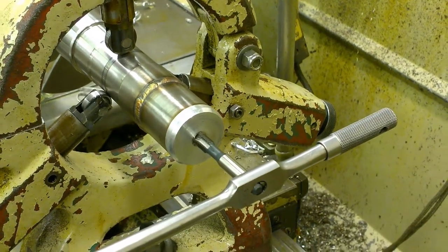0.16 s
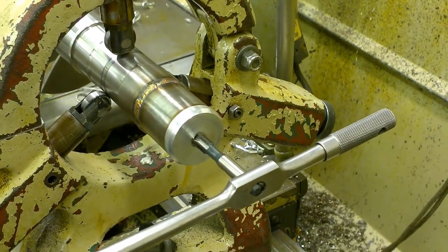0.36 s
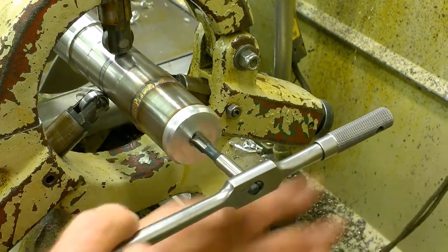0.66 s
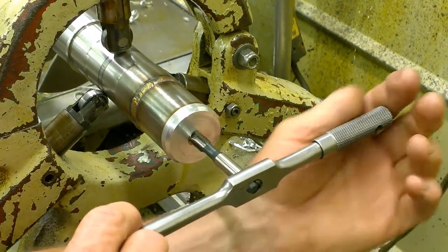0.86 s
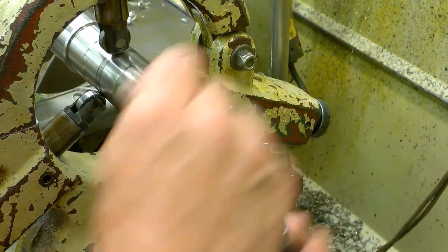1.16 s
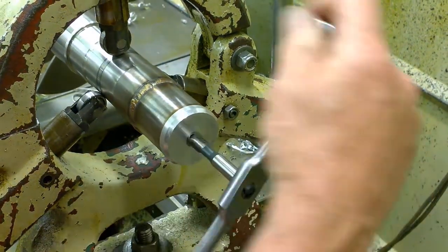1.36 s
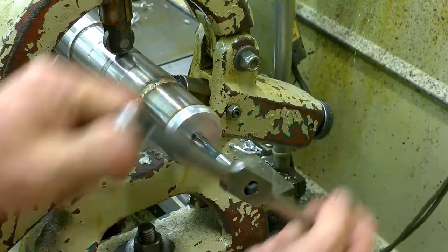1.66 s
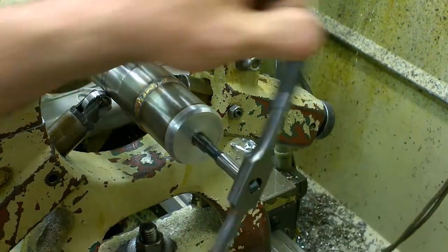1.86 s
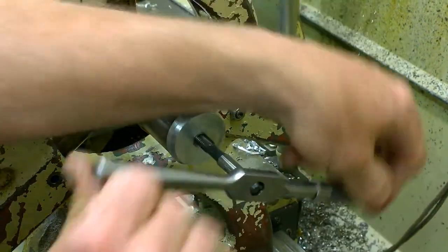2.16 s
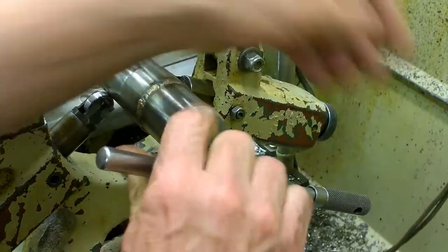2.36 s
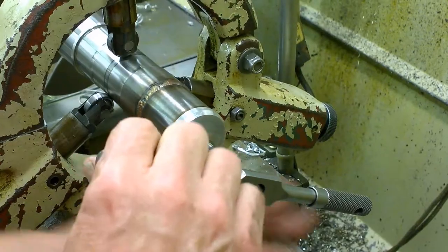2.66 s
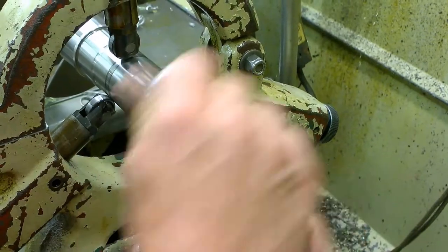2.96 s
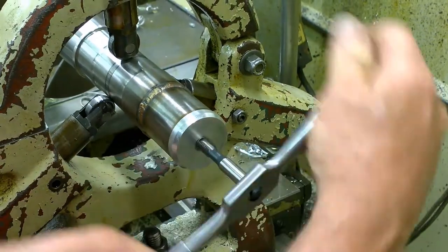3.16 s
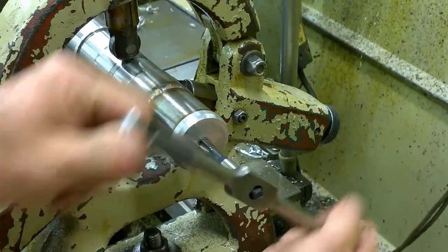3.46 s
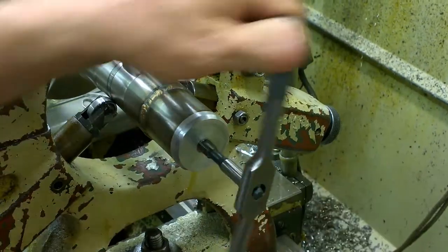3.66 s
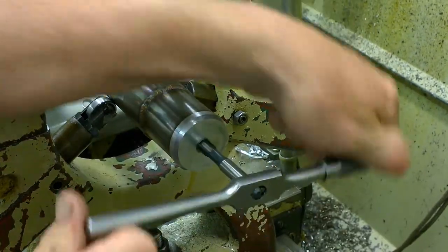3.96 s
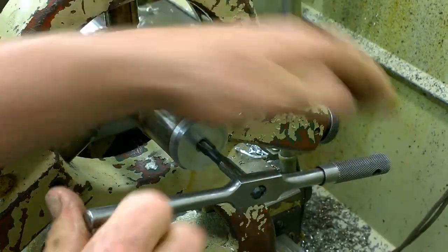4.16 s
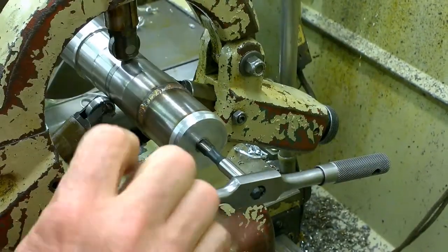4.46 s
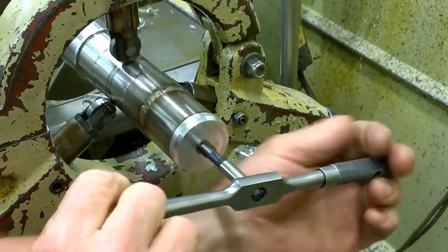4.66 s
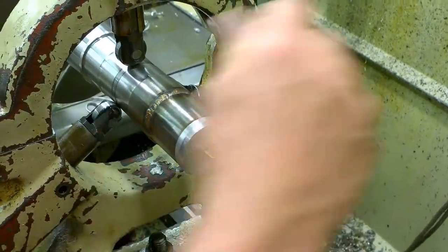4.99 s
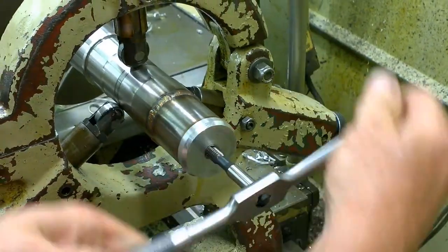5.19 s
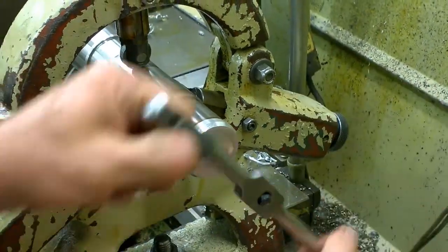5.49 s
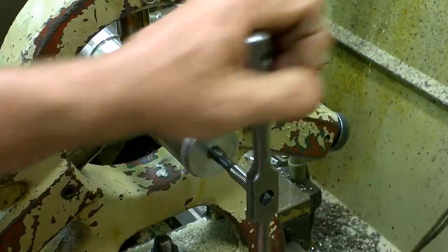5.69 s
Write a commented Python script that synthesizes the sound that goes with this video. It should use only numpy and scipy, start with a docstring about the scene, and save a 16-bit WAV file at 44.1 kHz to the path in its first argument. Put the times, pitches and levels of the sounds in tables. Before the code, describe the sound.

A hand-turned tap squeals twice as it cuts into metal, high and wavering, over the steady machine hum of a workshop.

```python
"""A large machine workshop. From the start, motors hum, a drive whines, and fans and distant machines
fill the room. At 0.3 s a cutting tool bites and chatters: it sticks and slips in a high squeal that hops
between close pitches, throbs with the cutter teeth and hisses as metal peels off. The tool lifts at 1.6 s;
while the squeal rings out in the hall, there is a far tap on metal and one more soft swell of hiss.
A second cut squeals from 2.5 s to 3.9 s and rings out too, leaving the machines running."""
import sys
import numpy as np
from scipy import signal
from scipy.fft import rfft, irfft
from scipy.io import wavfile
from scipy.ndimage import uniform_filter1d

SR = 44100
rng = np.random.default_rng(int(sys.argv[2]) if len(sys.argv) > 2 else 0)


def waveform_to_disk(signal):
    """Save audio, clipped to [-1, 1], as 16-bit WAV at the path in sys.argv[1]."""
    frames = np.transpose(np.atleast_2d(signal))
    scaled = np.clip(frames, -1, 1) * 32767
    samples = np.round(scaled).astype(np.int16)
    wavfile.write(sys.argv[1], SR, samples)


N = 257103

# The noise of the hall. Each row: frequency in Hz, relative level in dB.
HALL_SPECTRUM = [(15, -40), (30, -8), (50, -7), (152, 0), (349, -8.5), (551, -9.5), (850, -11), (1200, -17),
                 (1530, -22.5), (2500, -24.5), (3430, -23.5), (4400, -30), (6370, -27.5), (8110, -34.5),
                 (11000, -36.5), (15500, -45)]
# How wide it sounds. Each row: frequency in Hz, level of the side noise over the middle noise in dB.
HALL_WIDTH = [(60, -20), (200, -18.5), (380, -9.5), (700, -7.5), (1290, 1.5), (2400, 0.5)]
# Which way it leans. Each row: frequency in Hz, left minus right in dB.
HALL_BALANCE = [(60, -4), (110, -2), (200, -1.0), (380, 0), (700, -3), (1290, -0.5), (2380, -3.5),
                (4400, -2.5), (8120, -2), (15000, 5.5)]
# Two fans run a little apart in speed, so they beat. Each entry: one fan's blade tone in Hz.
FAN_BLADE_HZ = (384.5, 386.17)
# Each entry, one per harmonic: a time in seconds when the two fans are in step.
FAN_IN_STEP_TIMES = (.47, .22, 0)
# Each row, one per harmonic: level of the first fan in dB, level of the second in dB.
FAN_LEVELS = [(-50.5, -52.5), (-49, -52.5), (-59, -75.5)]
# The motor's hum. Each row: multiple of the motor's rate, level in dB.
MOTOR_HARMONICS = [(1, -53), (12, -56), (24, -70), (40, -69), (42, -75), (48, -77), (54, -74), (60, -76),
                   (96, -72), (120, -76)]
# Steady mains and gear tones. Each row: pitch in Hz, level in dB.
GEAR_TONES = [(120, -51), (286.6, -57), (360, -62), (573.2, -57), (858, -62), (974.5, -62), (1176.6, -62)]
# Low room resonances and narrow ringing bands in the workshop's rumble.
# Each row: pitch in Hz, width in Hz, level in dB.
RESONANCES = [(61.8, 7.21, -51), (92.814, 10.11, -52), (124.86, 11.9, -51.5), (149.6, 5.877, -50),
              (202.89, 11.013, -49), (247.69, 11.645, -52), (711.22, 16.63, -50), (1965.3, 38.14, -58),
              (4331, 6.14, -78.5), (6386.4, 9.4, -69.5), (6460.6, 7.53, -68)]
# A deep throb that comes and goes. Each row: time in seconds, level in dB.
DEEP_THROB_LEVELS = [(0, -37), (.06, -33.5), (.23, -36.5), (.34, -50.5), (.45, -35), (.73, -51.5),
                     (1.36, -40), (1.54, -44), (1.75, -35), (2.13, -41.5), (2.26, -35), (2.58, -41.5),
                     (2.69, -55.5), (3.9, -48), (4.12, -39.5), (4.22, -53), (5.1, -48.5), (5.83, -48.5)]
# The drive's whine. Each row: time in seconds, level in dB.
WHINE_LEVELS = [(0, -65), (1.25, -62), (1.75, -65), (3.25, -61), (4.25, -64), (5.2, -63), (5.5, -59),
                (5.83, -58)]
# Tones beside the whine. Each row: distance in multiples of the beat rate, relative level in dB.
WHINE_SIDE_TONES = [(-3, -8.5), (-2, -9.5), (-1, -18.5), (1, -22.5), (2, -26.5), (3, -22.5)]
# A far tap on metal. Each row: start in seconds, pitch in Hz, level in dB, seconds to fade by 60 dB.
FAR_TAPS = [(1.644, 944.3, -33, 0.17)]
# The cutting hiss. Each row: frequency in Hz, relative level in dB.
HISS_SPECTRUM = [(3800, -22.5), (4400, -26.5), (5300, 5.5), (6800, -1), (7600, -8), (9500, -12),
                 (12000, -15.5), (14500, -26.5), (15500, -33.5)]
# Its swell after the first cut. Each row: peak time in seconds, half length in seconds, level in dB.
HISS_SWELLS = [(1.853, 0.11975, -48)]
# Brief tones as the tool bites. Each row: start in seconds, pitch in Hz, left and right levels in dB,
# seconds to fade by 60 dB.
BITE_TONES = [(.33, 4956, -38, -29.5, 1.0), (.4, 5030, -41, -40.5, 0.662), (2.52, 5147, -39, -42, 0.703)]
# The two cuts. Each row: bite and lift times in seconds, spindle rate in Hz, tooth rate in Hz.
CUT_PASSES = [(.322, 1.57, 40, 233.3), (2.462, 3.86, 29, 215.6)]
# Pitches the chatter locks on to. Each row: start in seconds, pitch in Hz.
CHATTER_PITCHES = [(0, 5001), (.4, 4890), (.54, 4864), (1.03, 4867), (2.3, 5036), (2.68, 5025),
                   (3.07, 4993), (3.23, 5028), (3.39, 4997), (3.78, 4992)]
# Throbbing tones beside the squeal. Each row: distance in multiples of the tooth rate,
# relative level in dB in the first cut, the same in the second.
TOOTH_TONES = [(-2, -7.5, -6), (-1, 3.5, 2.5), (1, 5, 0.5), (2, -16.5, -9.5), (3, -22, -23)]
# Layers that sound with the squeal. Each named row: level in dB in the first cut and in the second,
# how many dB lower it starts, build-up in seconds, slope in dB per second, seconds to fade by 60 dB.
CUT_LAYERS = {"line one turn below": (-39.5, -42, 5, -0.0816, -2, 1.0),
              "line one turn above": (-36.5, -40, 2.5, 0.135, -2.5, 1.0),
              "rough skirt": (-36, -38, 7, 0.0004, -1.5, 1.2373),
              "tooth throb": (-52, -54.5, 12.5, 0.0734, 4.5, .9),
              "octave": (-53.5, -57, 8, 0.0941, 2.5, 0.2009),
              "cutting hiss": (-40, -40.5, 15, .07, -3.3, 0.75)}
# The squeal, one list per cut. Each row: time in seconds, left and right levels in dB,
# how far the left ear's wave is ahead in radians.
SQUEAL_CURVES = [
    [(.33, -39, -42, 1.033), (.4, -33, -37, 1.8), (.5, -36.5, -25.5, 2.3), (.58, -31, -32, 3.3),
     (.7, -22, -34.5, 2.596), (.8, -27.5, -36, 0.8071), (.91, -22, -26, 3.32), (1.01, -24.5, -29.5, 4.08),
     (1.1, -30, -43, 6.195), (1.16, -31, -32, 8.98), (1.22, -26, -35.5, 8.965),
     (1.35, -39.5, -28.5, 10.829), (1.46, -31, -43.5, 10.422), (1.52, -33.5, -25.5, 7.143),
     (1.6, -33, -33.5, 9.719), (1.69, -38.5, -36, 6.233)],
    [(2.47, -46.5, -47.5, 3.5), (2.5, -36, -32, 3), (2.55, -28, -37, 1.1767), (2.62, -39.5, -43, 0.5416),
     (2.67, -33, -35, -.8), (2.715, -42, -40, -1), (2.73, -33, -30, 0), (2.82, -34, -29, .5),
     (2.9, -37.5, -38, -0.28), (3.0, -29.5, -35.5, -2), (3.2, -37, -35.5, -4.5), (3.33, -30.5, -32, -4),
     (3.52, -27.5, -31, -5.5), (3.68, -42.5, -27.5, -6), (3.82, -29, -25.5, -9.5), (3.9, -45, -35, -10.5),
     (3.99, -33.5, -41, -15)],
]

TIME = np.arange(N) / SR  # seconds
BIN_HZ = np.fft.rfftfreq(N, 1 / SR)


def undb(db):
    """Turns decibels into a gain."""
    return 10 ** (np.asarray(db) / 20)


def spectrum(table):
    """Reads a table of frequencies and values at every bin, on a log-frequency axis."""
    hz, values = np.transpose(table)
    return np.interp(np.log(BIN_HZ + 1), np.log(hz), values)


def unit(x):
    """Scales each channel to an average power of 1."""
    return x / np.sqrt(np.mean(np.abs(x) ** 2, axis=-1, keepdims=True))


def coloured(gain_db, channels):
    """Unrelated noises with the given gain at each frequency."""
    return irfft(rfft(rng.standard_normal((channels, N))) * undb(gain_db), N)


def flutter(width_hz):
    """A random wobble for each ear; multiplying a tone by it spreads the tone into a band."""
    step = 16  # samples per random value
    pole = np.exp(-np.pi * width_hz * step / SR)
    shape = (2, N // step + 1)
    noise = rng.standard_normal(shape) + 1j * rng.standard_normal(shape)
    smooth = unit(signal.lfilter([1], [1, -pole], signal.lfilter([1], [1, -pole ** 8], noise)))
    return uniform_filter1d(np.repeat(smooth, step, axis=1), size=step)[:, :N]


def drift(width_hz, depth):
    """Nudges a wave slowly ahead and behind at random, for each ear."""
    return np.exp(1j * depth * flutter(width_hz).real)


def spin(hz):
    """A point circling at this rate; multiplying a tone by it shifts the pitch up by hz."""
    return np.exp(2j * np.pi * np.cumsum(hz * np.ones(N)) / SR)


def tone(hz):
    """A fixed or moving pitch; its real part is a wave of average power 1."""
    return np.sqrt(2) * spin(hz)


def steady(hz, db, crest_s=0):
    """A pure tone that reaches the right ear slightly before the left."""
    ear_lead_s = np.array([[0], [7e-5]])
    return np.sqrt(2) * undb(db) * np.cos(2 * np.pi * hz * (TIME - crest_s + ear_lead_s))


def ring(start_s, hz, db, fade_s, rise_s=0.0113):
    """A tone that starts quickly and dies away."""
    age = np.clip(TIME - start_s, 0, None)
    return undb(db - 60 * age / fade_s) * np.sin(2 * np.pi * hz * age) * np.minimum(age / rise_s, 1)


def hall(level_db=-35.5):
    """Fans and far machines all around: alike at both ears in the bass, unrelated in the treble."""
    colour_db = spectrum(HALL_SPECTRUM)
    middle = rfft(coloured(colour_db, channels=1)[0])
    side = rfft(coloured(colour_db + spectrum(HALL_WIDTH), channels=1)[0])
    pan_db = spectrum(HALL_BALANCE) / 2
    ears = np.array([(middle + side) * undb(pan_db), (middle - side) * undb(-pan_db)])
    edges_hz = (0, 180, 700, 3000, 8000, 22050)
    noise = 0
    for low, high in zip(edges_hz, edges_hz[1:]):
        band = irfft(ears * ((BIN_HZ >= low) & (BIN_HZ < high)), N)
        noise += band * undb(0.916 * flutter(8.096)[0].real)  # each band swells on its own
    return undb(level_db) * unit(noise.ravel()).reshape(2, N)


def fans():
    """The blade tones of two fans slide in and out of step, so they slowly beat."""
    return sum(steady(harmonic * hz, db, in_step_s)
               for harmonic, (in_step_s, levels) in enumerate(zip(FAN_IN_STEP_TIMES, FAN_LEVELS), 1)
               for hz, db in zip(FAN_BLADE_HZ, levels))


def motor(rate_hz=59.81):
    """A motor hums at multiples of its rate, along with mains and gear tones."""
    hum = sum(steady(multiple * rate_hz, db, rng.random()) for multiple, db in MOTOR_HARMONICS)
    return hum + sum(steady(hz, db) for hz, db in GEAR_TONES)


def resonances():
    """Low room resonances and narrow ringing bands; higher ones are less alike at the two ears."""
    rings = 0
    for hz, width_hz, db in RESONANCES:
        wobble, apart = flutter(width_hz), min(hz / 2000, 1)
        ears = wobble[0] + apart * (wobble - wobble[0])
        rings += undb(db) * (tone(hz) * ears).real
    return rings


def deep_throb(hz=42.664):
    """A deep tone comes and goes, a little louder on the right."""
    gain = undb(np.interp(TIME, *np.transpose(DEEP_THROB_LEVELS)))
    wave = tone(hz) * drift(2.208, 0.648)[0]
    return wave.real * gain * undb([[-1], [1]])


def drive_whine(switching_hz=8799.8, beat_hz=57.2):
    """The switching tone of a motor drive, beating at the motor's speed."""
    beats = 1 + sum(undb(db) * spin(beat_hz) ** multiple for multiple, db in WHINE_SIDE_TONES)
    ear_phase = np.exp(.9j * np.array([[0], [1]]))
    wave = tone(switching_hz) * beats * drift(.7, .35) * ear_phase
    return wave.real * undb(np.interp(TIME, *np.transpose(WHINE_LEVELS)))


def far_tap():
    """Metal is tapped far away and rings briefly."""
    return sum(ring(*tap) for tap in FAR_TAPS)


def cutting_hiss():
    """The hiss of metal peeling off."""
    return unit(coloured(spectrum(HISS_SPECTRUM), channels=2))


def hiss_swell():
    """The hiss rises and falls softly once more after the first cut."""
    gain = sum(undb(db) * np.exp(-.5 * ((TIME - peak_s) / half_s) ** 2)
               for peak_s, half_s, db in HISS_SWELLS)
    return gain * cutting_hiss()


def bite_rings():
    """As the tool bites, pitches near the squeal sound briefly and ring out."""
    return sum(ring(start_s, hz, np.array([[left], [right]]), fade_s)
               for start_s, hz, left, right, fade_s in BITE_TONES)


def layer_gain(which, first_db, second_db, lower_db, build_s, slope, fade_s):
    """One layer of a cut builds up after the bite, leans up or down, and rings out after the lift."""
    bite_s, lift_s = CUT_PASSES[which][:2]
    age = np.clip(TIME - bite_s, 0, lift_s - bite_s)
    cutting_db = (first_db, second_db)[which] - lower_db * np.exp(-age / build_s) + slope * age
    return undb(cutting_db - 60 * np.clip(TIME - lift_s, 0, None) / fade_s)


def tooth_throb(which, tooth_hz):
    """The cutter teeth make the squeal throb, adding unsteady tones on both sides of it."""
    return sum(undb(levels[which]) * spin(tooth_hz) ** multiple
               * (0.7829 * drift(2.138, 1.3677) + 0.407 * flutter(10.6))
               for multiple, *levels in TOOTH_TONES)


def overtones(hz):
    """Sticking and slipping is no pure wave: it adds blurred tones at two and three times the pitch."""
    double = tone(2 * hz) * (0.499 * drift(5.22, 0.629) + 0.8312 * flutter(135.3))
    triple = undb(-17.5) * tone(3 * hz) * (.4 + flutter(150))
    return double + triple


def squeal(which, chatter, fade_s=1.02):
    """The squeal wanders between the ears as direct sound and echoes trade places, then rings out."""
    times, left_db, right_db, lead = np.transpose(SQUEAL_CURVES[which])
    fade_db = 60 * np.clip(TIME - times[-1], 0, None) / fade_s
    gains = undb([np.interp(TIME, times, db) - fade_db for db in (left_db, right_db)])
    ear_phase = np.exp(.5j * np.interp(TIME, times, lead) * np.array([[1], [-1]]))
    return chatter * drift(3, .7)[0] * ear_phase * gains


def cut(which, rise_s=0.01634, rough_shift_hz=30.14):
    """One pass of the tool (0 or 1): it sticks and slips, hopping between close pitches."""
    bite_s, _, spindle_hz, tooth_hz = CUT_PASSES[which]
    below, above, rough, teeth, upper, hiss = (layer_gain(which, *row) for row in CUT_LAYERS.values())
    starts, pitches = np.transpose(CHATTER_PITCHES)
    held_hz = pitches[np.searchsorted(starts, TIME, side="right") - 1]
    hz = uniform_filter1d(held_hz, size=400)  # each hop becomes a quick slide
    chatter = tone(hz)
    main = squeal(which, chatter)
    throb = teeth * tooth_throb(which, tooth_hz)
    turn = spin(spindle_hz)  # the turning spindle adds a tone below the squeal and one above
    neighbours = below * flutter(10) / turn + above * flutter(10) * turn
    rough_band = rough * flutter(125.45) * spin(rough_shift_hz)
    tones = main + chatter * (throb + neighbours + rough_band) + upper * overtones(hz)
    onset = np.clip((TIME - bite_s) / rise_s, 0, 1)
    return onset * (tones.real + hiss * cutting_hiss())


def scene():
    """Both cuts and the workshop around them, in stereo."""
    cuts = cut(0) + cut(1)
    background = fans() + motor() + resonances() + deep_throb() + drive_whine() + hall()
    return background + far_tap() + hiss_swell() + bite_rings() + cuts


def record(dry):
    """Takes away the highest treble with a steep filter."""
    top_hz = 15740
    lowpass = signal.ellip(14, .2, 60, top_hz, fs=SR, output="sos")
    return signal.sosfilt(lowpass, dry)


dry = scene()
out = record(dry)
waveform_to_disk(out)
```